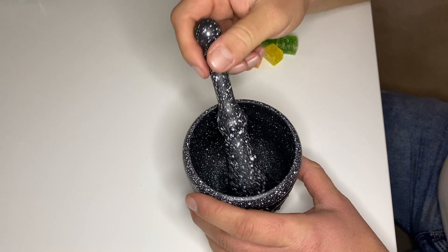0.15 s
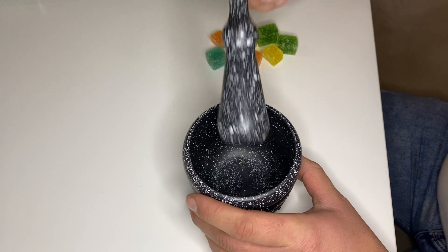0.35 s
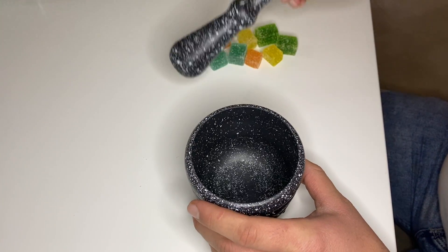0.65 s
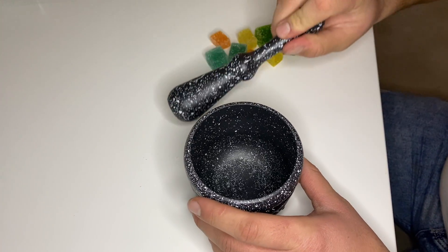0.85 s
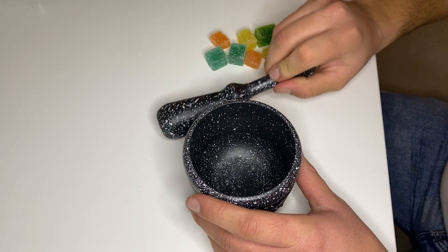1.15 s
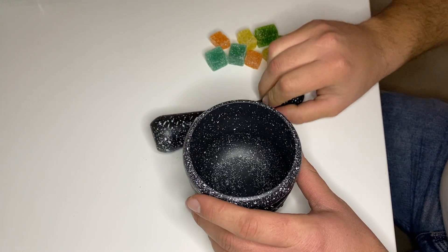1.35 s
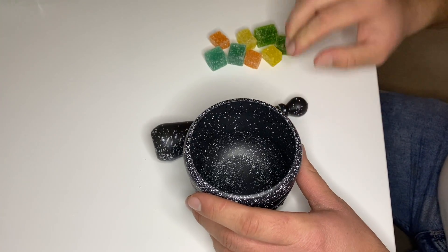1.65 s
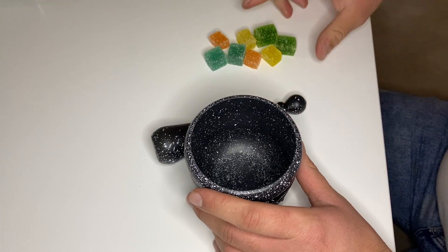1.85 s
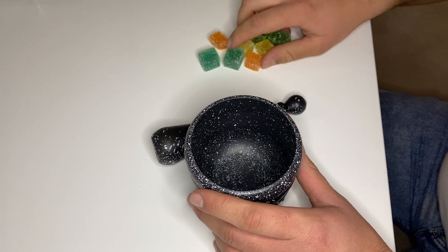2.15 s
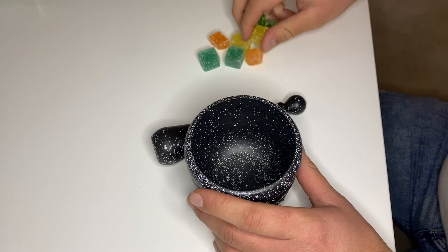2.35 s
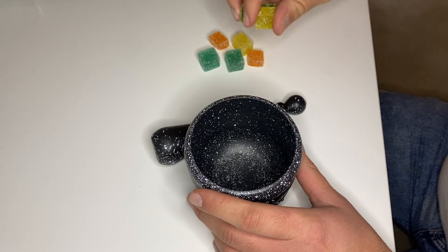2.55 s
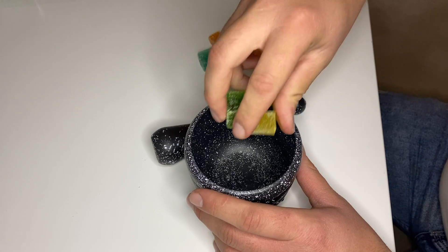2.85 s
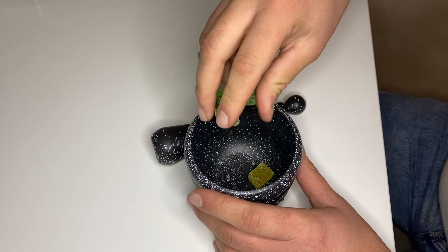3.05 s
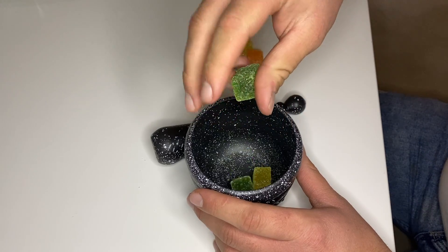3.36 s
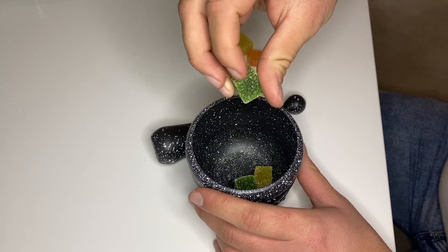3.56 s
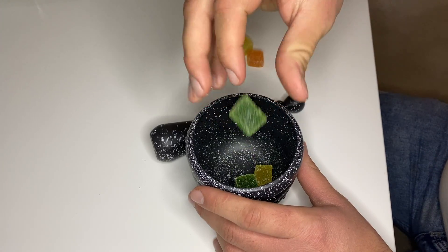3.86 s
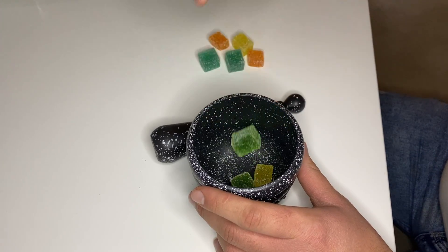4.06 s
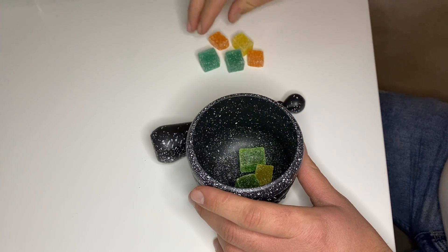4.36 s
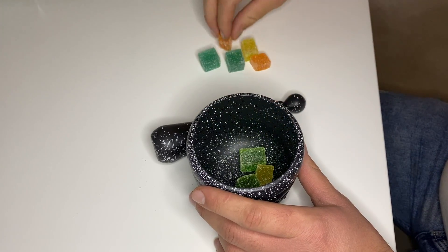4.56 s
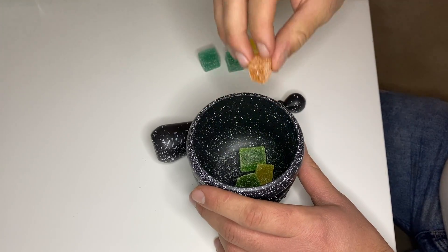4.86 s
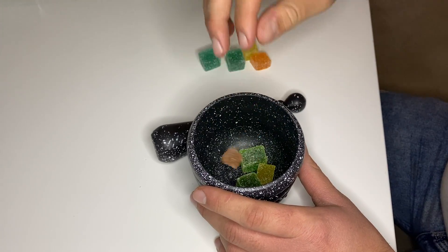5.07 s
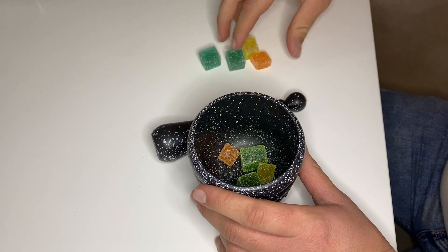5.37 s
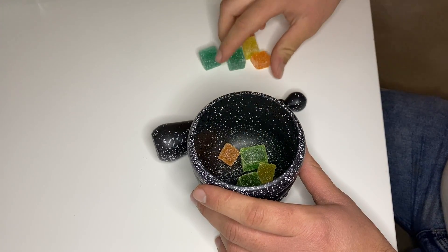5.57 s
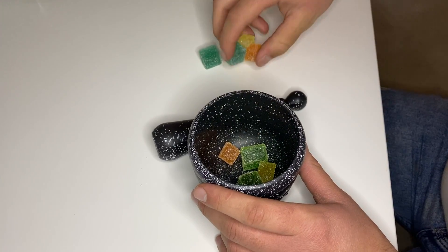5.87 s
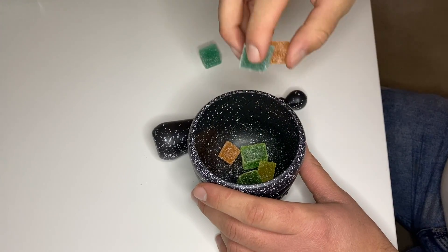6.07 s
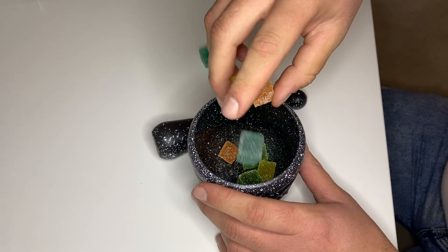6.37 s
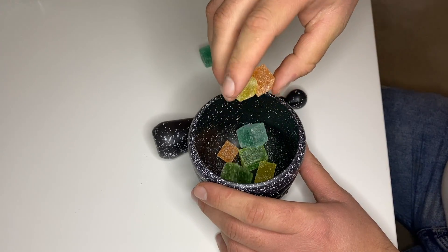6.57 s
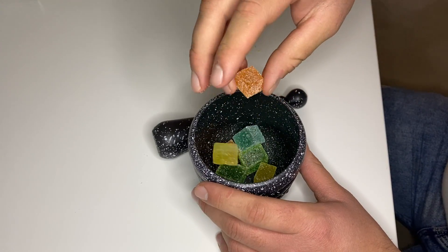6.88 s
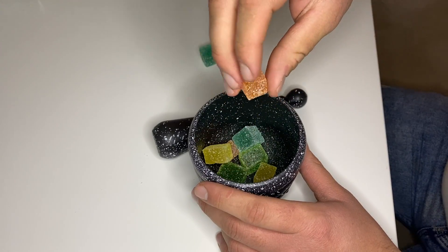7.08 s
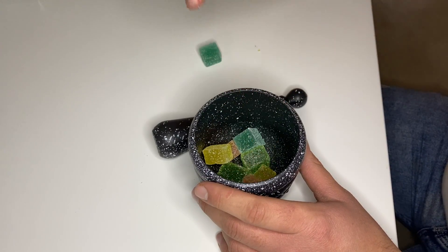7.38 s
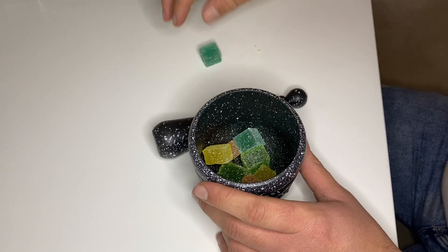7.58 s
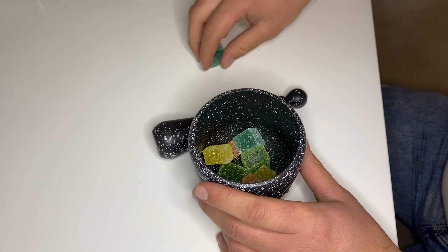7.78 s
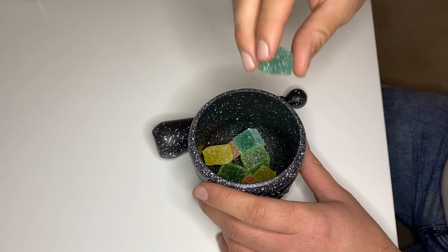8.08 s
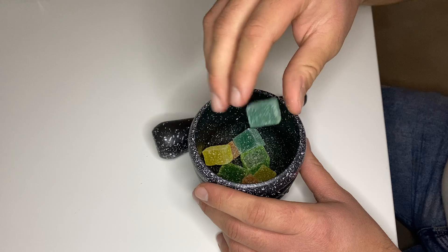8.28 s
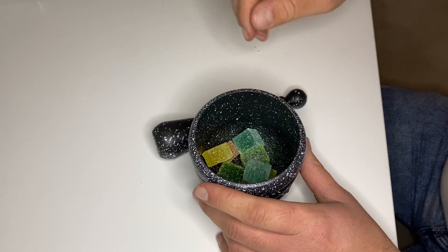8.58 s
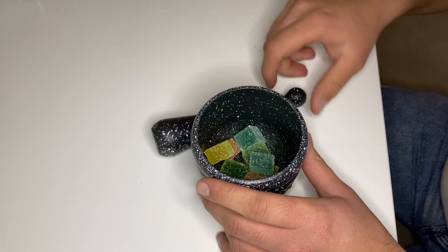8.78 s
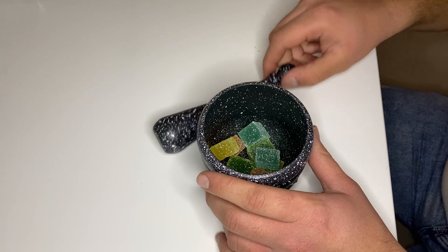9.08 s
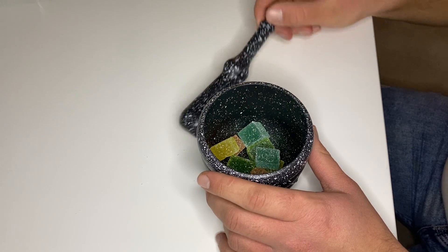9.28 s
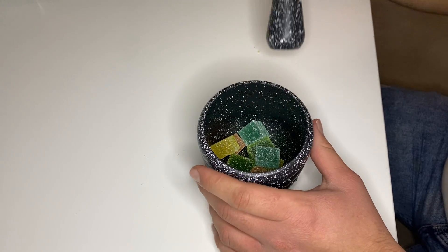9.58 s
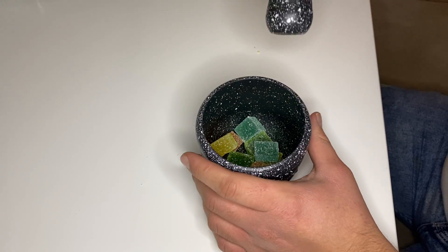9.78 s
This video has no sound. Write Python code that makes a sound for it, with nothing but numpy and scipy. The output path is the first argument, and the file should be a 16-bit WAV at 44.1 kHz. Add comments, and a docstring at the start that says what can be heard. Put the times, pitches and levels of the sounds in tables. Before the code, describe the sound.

Hard candy cubes land in a small stone bowl with crisp cracks and low table thuds, between a pestle's clunks and short dragging scrapes.

```python
"""Sugar-coated jelly cubes drop into a stone-like mortar: grain bursts crack and ring the bowl, thuds bend the table.
First the pestle is lifted out and laid on the table, chinking and clacking as damped modes; at the end it
is dragged off in coloured stick-slip clicks. Between drops, cubes scuff and slide on the table as
coloured grains. A small room adds a diffuse tail; hush and a low hand rumble are shaped noise."""
import sys
import numpy as np
from scipy import signal
from scipy.fft import rfft, irfft, next_fast_len
from scipy.io import wavfile
from scipy.ndimage import uniform_filter1d

SR = 44100
rng = np.random.default_rng(int(sys.argv[2]) if len(sys.argv) > 2 else 0)


def to_wav(s):
    """Save 16-bit WAV."""
    ch = np.atleast_2d(s).T  # columns
    pcm = np.round(np.clip(ch, -1, 1) * 32767)  # PCM
    wavfile.write(sys.argv[1], SR, pcm.astype(np.int16))


N = 437913
TIME = np.arange(N) / SR


def from_db(db):
    """Decibels to gain."""
    return 10 ** (np.asarray(db) / 20)


def rms_one(x):
    """Scale to rms 1."""
    return x / np.sqrt(np.mean(x ** 2) + 1e-20)


def unit_blow(x):
    """Scale a blow to rms 1 over its first 20 ms, at each microphone."""
    return x / np.sqrt(np.mean(x[..., :SR // 50] ** 2, axis=-1, keepdims=True) + 1e-20)


def at_hz(points, hz):
    """Interpolate a table on a log-frequency axis."""
    table_hz, values = np.array(points).T[:2]
    return np.interp(np.log(np.maximum(hz, 1)), np.log(table_hz), values)


def coloured(x, spectrum):
    """Filter a signal by a spectrum table in dB."""
    size = next_fast_len(x.shape[-1])
    gain = from_db(at_hz(spectrum, np.fft.rfftfreq(size, 1 / SR)))
    return irfft(rfft(x, size) * gain, size)[..., :x.shape[-1]]


# Left-right likeness of diffuse sound. Each row: frequency in Hz, correlation from 0 to 1.
LIKENESS = [(50, 0.84), (250, 0.97), (500, 0.19), (1000, 0.42), (2000, 0.062), (8000, 0.009)]


def diffuse(size):
    """Stereo noise from mid and side parts, weighted for the likeness at each frequency."""
    padded = next_fast_len(size)
    mid, side = rfft(rng.standard_normal((2, padded)))
    alike = at_hz(LIKENESS, np.fft.rfftfreq(padded, 1 / SR))
    spectrum = np.sqrt(1 + alike) * mid + np.sqrt(1 - alike) * side * [[1], [-1]]
    return irfft(spectrum, padded)[:, :size]


def add(out, s, sound):
    """Mix a sound in at a time in seconds."""
    start = round(s * SR)
    out[:, start:start + sound.shape[-1]] += sound[..., :N - start]


def opposite(pan_db):
    """Gain pair for a left-right level difference in dB."""
    return from_db(np.array([[pan_db], [-pan_db]]) / 2)


def soft_start(t, rise_s):
    """Gain of a yielding contact: it rises without a click."""
    return 1 - np.exp(-(t / rise_s) ** 2)


def decay(t, t60):
    """Exponential decay by 60 dB in t60 seconds."""
    return np.exp(-np.log(1000) * t / t60)


def mode(hz, t60, size):
    """A dying sine."""
    t = TIME[:size]
    return decay(t, t60) * np.sin(2 * np.pi * hz * t)


def slow_chance(rate_hz):
    """Random wander with rms 1: noise through two one-pole low-passes."""
    r = np.exp(-2 * np.pi * rate_hz / SR)
    return rms_one(signal.lfilter([1], [1, -2 * r, r * r], rng.standard_normal(N)))


def strokes(rows):
    """Gain over time of hand strokes (start s, length s, dB): each swells smoothly and fades."""
    rise_share = 0.32
    gain = np.zeros(N)
    for start, length, db in rows:
        first, last = np.searchsorted(TIME, [start, start + length])
        progress = np.interp((TIME[first:last] - start) / length, [0, rise_share, 1], [0, 1, 0])
        gain[first:last] += from_db(db) * np.sin(np.pi / 2 * progress) ** 2
    return gain


def grains(size, per_s, spread_db):
    """Random clicks of uneven size, partly alike at the two microphones."""
    born = rng.random(size) < per_s / SR
    heard = rng.standard_normal(size) + rng.standard_normal((2, size))
    return born * from_db(spread_db * np.minimum(rng.exponential(1, size), 4)) * heard


def crush(decay_s, per_s=14000, crumb_db=-17, crumb_s=0.0034):
    """A burst of breaking grains swells and dies away while a few more crumble."""
    t = TIME[:SR // 16]
    burst = grains(len(t), per_s, spread_db=6.5) * t / decay_s * np.exp(-t / decay_s)
    crumbs = grains(len(t), per_s=6000, spread_db=5.5) * np.exp(-t / crumb_s)
    return burst + from_db(crumb_db) * crumbs


def struck(force, modes, vary_db, detune=0.023):
    """A force rings a body; each mode gets a small random shift in pitch and strength, as contact points vary."""
    out = 0
    for k, (hz, db, t60, pan_db) in enumerate(modes):
        stronger, higher = rng.standard_normal(2)
        tone = mode(hz * (1 + detune * higher), t60, size=2500)
        ring = unit_blow(signal.fftconvolve(force, tone[None], axes=1)[:, :force.shape[1]])
        out = out + (-1) ** k * from_db(db + vary_db * stronger) * opposite(pan_db) * ring
    return out / np.sqrt(np.mean(out[:, :SR // 50] ** 2))


# Room air. Each row: frequency in Hz, relative density in dB per Hz.
HUSH = [(12, -36.5), (25, -15), (50, -1.5), (100, -20.5), (280, -30), (420, -24.5), (840, -33),
        (1300, -36.5), (2000, -39.5), (3200, -44), (3900, -44.5), (4600, -45), (6300, -47.5), (9000, -55),
        (16000, -73)]
# Hand rumble. Each row: frequency in Hz, relative density in dB per Hz.
RUMBLE_COLOUR = [(10, -57.5), (24, -24), (45, -6), (75, 4), (140, -4), (250, -5.5), (500, -27.5),
                 (1000, -54)]
# Hands moving about. Each row: start in seconds, length in seconds, gain added to the resting rumble in dB.
HAND_MOVES = [(1.2, 0.56, -61), (2.0, 0.33, -54), (3.1, 0.55, -66.5), (4.25, 0.88, -69),
              (4.65, 0.61, -58.5), (5.4, 0.54, -68), (6.55, 0.7, -52.5), (7.65, 0.64, -62),
              (9.05, 0.99, -58), (9.6, 0.54, -57.5)]


def background(hush_db=-65, resting_db=-67.5, lumpy_db=3.0):
    """Quiet room air, and a low lumpy rumble that swells while the hands move."""
    lumps_db = lumpy_db * rms_one(uniform_filter1d(rng.standard_normal(N), size=4000))
    rumble_gain = (from_db(resting_db) + strokes(HAND_MOVES)) * from_db(lumps_db)
    rumble = rumble_gain * rms_one(coloured(diffuse(N), RUMBLE_COLOUR))
    return from_db(hush_db) * rms_one(coloured(diffuse(N), HUSH)) + rumble


# Diffuse tail's colour. Each row: frequency in Hz, level in dB.
TAIL = [(100, -13.5), (260, 2), (420, -10), (700, 2.5), (1500, 0.5), (4000, -1), (8000, -3), (15000, -13.5)]
# Diffuse tail's decay. Each row: frequency in Hz, t60 in seconds.
TAIL_T60 = [(100, 0.63), (700, 0.47), (1800, 0.39), (4000, 0.33), (7000, 0.23), (14000, 0.3)]


def room(x, build_s=0.0027):
    """A diffuse tail builds up quickly; each band of noise decays at its own rate."""
    t = TIME[:SR * 2 // 3]
    hz = np.fft.rfftfreq(len(t), 1 / SR)
    noise = rfft(diffuse(len(t))) * from_db(at_hz(TAIL, hz))
    edges_hz, tail = np.geomspace(60, 18000, 17), 0
    for low, high in zip(edges_hz, edges_hz[1:]):
        band = irfft(noise * (hz >= low) * (hz < high), len(t))
        t60 = at_hz(TAIL_T60, np.sqrt(low * high))
        tail = tail + band * decay(t, t60) * np.sqrt(np.log(1000) / (t60 * SR))
    return signal.fftconvolve(x, tail * soft_start(t, build_s), axes=1)[:, :N]


# Short dry ticks and cracks. Each row: time in seconds, level in dB, pitch in Hz, t60 in seconds.
TICKS = [(.197, -47.5, 1960, 0.011), (1.857, -67, 5200, 0.0023), (6.0149, -52, 854, 0.0047),
         (9.459, -63, 2340, 0.0022)]


def dry_ticks():
    """Tiny close ticks: softly started sines with almost no ring."""
    out = np.zeros((2, N))
    for s, level_db, hz, t60 in TICKS:
        tick = mode(hz, t60, size=1000) * soft_start(TIME[:1000], rise_s=0.00052)
        add(out, s, from_db(level_db) * unit_blow(tick))
    return out


# Thin squeak while the fingers gather candies. Each row: time in seconds, pitch in Hz, level in dB.
SQUEAK = [(5.864, 1084, -89), (5.885, 1097, -60.5), (5.915, 1155, -75.5), (5.943, 1180, -68),
          (5.975, 1198, -68), (6.005, 1167, -89)]


def squeak(waver=.008, octave_db=-26):
    """A nearly pure, unsteady tone with a weak octave; it rises, then eases down at its end."""
    s, hz, db = np.transpose(SQUEAK)
    wavering_hz = np.interp(TIME, s, hz) * (1 + waver * slow_chance(rate_hz=34))
    phase = 2 * np.pi * np.cumsum(wavering_hz) / SR
    gain = from_db(np.interp(TIME, s, db, left=-np.inf, right=-np.inf))
    tone = np.sin(phase) + from_db(octave_db) * np.sin(2 * phase)
    return gain * np.sqrt(2) * tone * np.ones((2, 1))


# Rolling or dragged pestle. Each row: start in seconds, length in seconds, level in dB.
RATTLES = [(1.003, 0.064, -60), (1.735, 0.13, -48.5), (9.08, .15, -57), (9.2, 0.21, -58)]
# Rattle. Each row: frequency in Hz, relative density in dB per Hz.
RATTLE_COLOUR = [(600, -16), (1150, 16), (1700, 0), (2300, -6.5), (2650, -3), (3100, -16), (3600, -23),
                 (8000, -42.5)]


def pestle_rattle(per_s=1200):
    """The stone chatters on the table top in quick, uneven touches."""
    return strokes(RATTLES) * rms_one(coloured(grains(N, per_s, spread_db=3.0), RATTLE_COLOUR))


# Pulls on the pestle's heavy end. Each row: start in seconds, length in seconds, level in dB.
PULLS = [(8.94, 0.056, -49), (9.04, 0.082, -47), (9.11, 0.24, -47.5), (9.25, 0.15, -46.5)]
# Dull rubbing. Each row: frequency in Hz, relative density in dB per Hz.
DRAG_COLOUR = [(120, -31), (250, 0), (380, 17), (500, 7), (650, -4), (1150, -1.5), (1500, -12.5),
               (2500, -25), (2850, -23), (3060, -16.5), (3300, -23), (4000, -23), (9000, -55)]


def pestle_drag(per_s=3000, judder_db=4, judder_hz=45):
    """The heavy end sticks and slips over the table in uneven clumps."""
    judder = from_db(judder_db * np.clip(slow_chance(judder_hz), -2, 2))
    slips = grains(N, per_s, spread_db=0.5) * judder
    return strokes(PULLS) * rms_one(coloured(slips, DRAG_COLOUR))


# Pestle bumps on mortar and table. Each row: time in seconds, thud in dB, knock in dB, clack in dB,
# bowl chink in dB, shaft ring in dB, thud pitch in Hz.
PESTLE = [(0.089, -44.5, -52, -89, -74.5, -89, 398), (0.101, -35, -66, -90, -77, -86, 270),
          (0.163, -37, -56.5, -81, -71, -93, 415), (.197, -25, -36.5, -52.5, -46.5, -77, 382),
          (.239, -27.5, -39.5, -61, -57.5, -83, 383), (.261, -41, -62, -74, -76, -84, 343),
          (1.006, -28, -43, -71, -83, -66, 342), (1.128, -48.5, -53, -65.5, -90, -84, 368),
          (1.238, -37, -51.5, -87, -93, -94, 384), (1.383, -48, -66, -77, -70, -65.5, 298),
          (1.418, -43.5, -48, -82, -95, -82, 296), (1.733, -34, -38, -58, -59.5, -75, 440),
          (1.742, -38, -34.5, -41, -64, -61, 397), (1.785, -41, -52.5, -56, -85, -60, 317),
          (8.692, -47, -57.5, -103, -81, -103, 357), (8.869, -41.5, -54.5, -83, -73, -90, 375),
          (9.104, -35, -35.5, -72, -86, -66, 421), (9.219, -40.5, -65, -83, -81, -69, 370),
          (9.287, -38, -58, -77, -77, -70, 333)]
# Pestle's clack modes. Each row: frequency in Hz, relative level in dB, t60 in seconds, left-right in dB.
CLACK = [(1550, 12, 0.021, -1), (1720, 15.5, 0.12, -10), (2100, 9, 0.003, 3), (2390, -7, 0.024, 22.5),
         (2630, -2, 0.24, -18.5), (3350, -19.5, .015, -41.5)]
# Shaft's longer modes. Each row: frequency in Hz, relative level in dB, t60 in seconds, left-right in dB.
SHAFT = [(1600, -1, 0.068, 3.5), (1850, -5, .05, 2), (2150, -6, .04, -1), (2600, 0.5, 0.089, -3.5),
         (3060, 2, .05, -2.5)]


def pestle_clacks():
    """The hard pestle chatters for a moment on whatever it meets, and its shaft rings on."""
    out = np.zeros((2, N))
    for s, thud_db, knock_db, clack_db, chink_db, shaft_db, thud_hz in PESTLE:
        force = crush(decay_s=0.00007, crumb_db=-14.5)
        clack = from_db(clack_db) * struck(force, CLACK, vary_db=2.0)
        shaft = from_db(shaft_db) * struck(force, SHAFT, vary_db=0.5, detune=.004)
        add(out, s - .0005, clack + shaft)
    return out


# Bowl's short ring. Each row: frequency in Hz, relative level in dB, t60 in seconds, left-right in dB.
BOWL = [(1944, -10, 0.0098, -4.5), (3300, 0.5, 0.0035, 2), (3287, -7, 0.015, -1), (3815, 6, 0.033, -1),
        (5010, -1.5, .006, -0.5), (6350, -8.5, 0.0048, 2)]
# Pestle rubbing the bowl's inside as it is lifted: start in seconds, length in seconds, level in dB.
GRAZE = (0.16, 0.054, -53)
# Rubbing on the bowl wall. Each row: frequency in Hz, relative density in dB per Hz.
GRAZE_COLOUR = [(1300, -22.5), (2400, -15), (2900, -7), (3300, 6), (3800, -7.5), (4500, -17), (7000, -16),
                (12000, -44.5)]


def pestle_chinks():
    """The pestle's touches ring the bowl's modes; grains make its scrape along the wall on the way out."""
    out = strokes([GRAZE]) * rms_one(coloured(grains(N, per_s=1900, spread_db=3.5), GRAZE_COLOUR))
    for s, thud_db, knock_db, clack_db, chink_db, *rest in PESTLE:
        add(out, s, from_db(chink_db) * struck(crush(decay_s=0.00035), BOWL, vary_db=2))
    return out


# Fingers slide candies or pestle. Each row: start in seconds, length in seconds, friction in dB, rustle in dB.
SLIDES = [(0.075, 0.27, -62, -68), (1.157, 0.081, -64, -80.5), (1.362, 0.051, -57, -79),
          (2.059, 0.25, -46, -73), (2.341, 0.085, -38, -66), (4.275, 0.26, -97, -72.5),
          (4.448, 0.12, -52, -72.5), (4.537, 0.048, -74, -66), (4.944, 0.16, -81.5, -73),
          (5.579, 0.14, -48.5, -71.5), (5.726, 0.14, -83, -72), (5.983, 0.04, -66, -63.5),
          (8.236, 0.074, -66.5, -72), (9.094, 0.074, -66, -84), (9.242, 0.27, -58.5, -74.5),
          (9.617, 0.18, -65.5, -70.5)]
# Sliding friction. Each row: frequency in Hz, relative density in dB per Hz.
FRICTION = [(100, -2), (250, -5.5), (420, 8), (700, -1.5), (1200, -3), (2000, -13), (3000, -16.5),
            (6000, -48.5)]
# Rustling sugar. Each row: frequency in Hz, relative density in dB per Hz.
RUSTLE = [(1200, -33), (3000, -3.5), (4000, 0), (6300, 3), (8500, -9.5), (10500, -6.5), (15000, -48.5)]


def sliding():
    """Dense small slips on the table top, and sugar crystals rubbing between the fingers."""
    start, length, friction_db, rustle_db = np.transpose(SLIDES)
    friction = rms_one(coloured(grains(N, per_s=1600, spread_db=1.5), FRICTION))
    rustle = rms_one(coloured(grains(N, per_s=2300, spread_db=2.0), RUSTLE))
    friction_gain = strokes(zip(start, length, friction_db))
    rustle_gain = strokes(zip(start, length, rustle_db))
    return friction_gain * friction + rustle_gain * rustle


# Candies tip and scuff under the fingers. Each row: time in seconds, thud in dB, rasp in dB, sugar crunch in dB.
SCUFFS = [(1.857, -66, -60, -75), (2.037, -47.5, -60.5, -75), (2.08, -51, -53, -78),
          (2.132, -52, -52.5, -54.5), (2.189, -48, -55, -79), (2.26, -45.5, -58, -77),
          (2.359, -42.5, -34, -70), (2.38, -39.5, -40, -57), (2.411, -43, -40.5, -45.5),
          (4.437, -53.5, -63, -86), (4.464, -47.5, -50, -88), (4.496, -47, -54.5, -76),
          (5.401, -56, -67, -95), (5.601, -53, -60.5, -92), (5.623, -43, -60, -77),
          (5.721, -51.5, -60, -65), (7.731, -41, -62, -79), (7.753, -52, -60, -76),
          (8.831, -52.5, -62.5, -67.5)]
# Grit on the table. Each row: frequency in Hz, relative density in dB per Hz.
RASP = [(600, -16.5), (1300, 9.5), (2400, 3.5), (3300, -4.5), (5000, -8.5), (7000, -22.5), (14000, -57)]
# Crack of the sugar crust. Each row: frequency in Hz, relative density in dB per Hz.
SUGAR = [(500, -18), (1500, -22.5), (3000, 4), (5000, -2.5), (6800, 6.5), (8400, -11), (9400, 0),
         (10800, -4), (12000, -23), (13500, -13.5), (16000, -32)]


def candies_on_table():
    """A cube tips over and its crust grinds briefly on the table top."""
    out = np.zeros((2, N))
    for s, thud_db, rasp_db, crunch_db in SCUFFS:
        add(out, s - .001, from_db(rasp_db) * unit_blow(coloured(crush(decay_s=0.00412), RASP)))
        add(out, s - .001, from_db(crunch_db) * unit_blow(coloured(crush(decay_s=0.00051), SUGAR)))
    return out


# Table top's crowded, well damped higher modes. Each row: frequency in Hz, relative level in dB.
BOARD = [(250, -27.5), (480, -7), (630, -5), (740, 8), (950, -1), (1170, 4), (1400, -8), (1700, -20),
         (2400, -24.5), (3500, -37.5), (8000, -63)]


def knocks(rows, t60):
    """The harder part of a contact sets the table's crowded higher modes ringing briefly."""
    out, t = np.zeros((2, N)), TIME[:SR // 12]
    shape = soft_start(t, rise_s=0.00039) * decay(t, t60)
    for s, thud_db, knock_db, *rest in rows:
        add(out, s, from_db(knock_db) * unit_blow(coloured(diffuse(len(t)), BOARD) * shape))
    return out


def right_later(x, lag_s):
    """The sound reaches the right microphone a little after the left."""
    return np.array([x[0], np.interp(TIME - lag_s, TIME, x[1])])


def scattered(blow, tail_db=-4, t60=0.43):
    """Each spot of the table radiates into the room differently, so every thud has a blurred tail of its own."""
    t = TIME[:blow.shape[1]]
    paths = diffuse(len(t)) * soft_start(t, rise_s=0.0068) * decay(t, t60)
    tail = signal.fftconvolve(blow, paths, axes=1)[:, :len(t)]
    return blow + from_db(tail_db) * blow.std() * rms_one(tail)


# Low standing waves of table and room. Each row: frequency in Hz, relative level in dB, t60 in seconds.
BOOM = [(87.65, -18, 0.21), (135, -14, 0.4), (180, -18, 0.39), (246.5, -4.5, 0.2), (271.1, -3.5, 0.13),
        (309.5, -4.5, 0.083), (352.4, -12, 0.13), (372.1, -8, 0.16), (421, -21.5, 0.39),
        (469.8, -16.5, 0.25), (499.6, -13.5, 0.28), (539, -9, 0.17), (599, -21.5, 0.2), (678.7, -21, 0.17),
        (718.9, -11.5, 0.11), (805, -25.5, 0.049)]
# Bending waves travel faster when higher: a thud falls to its pitch, which differs from blow to blow.
THUD_FALL_OCTAVES, THUD_FALL_S, THUD_VARY_OCTAVES = 0.75, 0.0016, 0.04
BEND_DB = 4.5  # on the scale of the standing waves
WALL_ECHO_S, WALL_ECHO_DB = .0128, -3.5


def thuds(rows, bend_t60, vary_db=3, right_lag_s=.00005, detune=0.013, off_pitch_db=4):
    """Each blow (s, dB, Hz) bends the table top at its own pitch and stirs most the standing waves near it."""
    out, t = np.zeros((2, N)), TIME[:SR // 2]
    hz, level_db, t60 = np.transpose(BOOM)[..., None]
    wave_gain = from_db(level_db) * decay(t, t60) * soft_start(t, rise_s=0.0087)
    bend_gain = from_db(BEND_DB) * decay(t, bend_t60) * soft_start(t, rise_s=.0016)
    fall = np.cumsum(2 ** (THUD_FALL_OCTAVES * np.exp(-t / THUD_FALL_S))) / SR
    for s, thud_db, thud_hz in rows:
        bend_hz = thud_hz * 2 ** (THUD_VARY_OCTAVES * rng.uniform(-1, 1))
        bend = bend_gain * np.sin(2 * np.pi * bend_hz * fall)
        bend = bend + from_db(WALL_ECHO_DB) * np.interp(t - WALL_ECHO_S, t, bend)
        turns = hz * (1 + detune * rng.standard_normal(hz.shape)) * t + rng.random(hz.shape)
        waves = wave_gain * np.sin((2 * np.pi * turns).astype(np.float32))
        chance = rng.standard_normal(len(BOOM)) + .5 * rng.standard_normal((2, len(BOOM)))
        octaves_off = np.abs(np.log2(hz[:, 0] / thud_hz))
        strengths = from_db(vary_db * chance - off_pitch_db * octaves_off)
        add(out, s, scattered(from_db(thud_db) * unit_blow(bend + strengths @ waves)))
    return right_later(out, right_lag_s)


def near_echoes(x, first_db=-16, second_db=-17):
    """Sound leaving the bowl comes back from the hands and the table within a few milliseconds."""
    out = x.copy()
    add(out, .0024, from_db(first_db) * x[::-1])  # sides swapped
    add(out, .0075, from_db(second_db) * x)
    return out


# Candies land or bounce in the mortar. Each row: time in seconds, thud in dB, knock in dB, bowl chink in dB,
# sugar crunch in dB, chink pitch in Hz, left-right in dB, bowl ring against the chink in dB, thud pitch in Hz.
DROPS = [(2.884, -56.5, -65.5, -69, -76, 3562, 0.5, -8, 349),
         (2.974, -24, -28.5, -18.5, -29, 3210, 0, -12.5, 331),
         (3.213, -40, -51, -49, -43, 4020, 0, -5.5, 440),
         (3.23, -31.5, -47.5, -47.5, -41, 3700, -0.5, 1.5, 473),
         (3.238, -17.5, -23, -24.5, -27.5, 3550, 1.5, -1.5, 465),
         (3.265, -47.5, -49, -46.5, -50, 3550, 1.5, -4.5, 400),
         (3.322, -31, -45, -28.5, -30, 3440, 0.5, -3.5, 315),
         (3.346, -35.5, -60, -49, -57, 3550, 1.5, -5.5, 314),
         (3.397, -54.5, -61, -58, -62, 3600, 2, -3, 326), (3.411, -31.5, -47, -48, -76, 3230, -5, -10, 273),
         (3.946, -24.5, -35.5, -43, -45.5, 3000, 5, -10.5, 406),
         (3.981, -21, -26, -32.5, -32.5, 3580, 1, 1.5, 397),
         (4.032, -54, -40, -49.5, -50, 3820, -1.5, -16.5, 310),
         (4.099, -24.5, -37, -37.5, -44, 3630, 1, -31, 425),
         (4.143, -56, -60, -69, -67, 3680, -3, -17, 330),
         (4.158, -51, -41.5, -37, -80, 3050, -4, -9.5, 295),
         (4.177, -40.5, -69, -53, -54.5, 3150, 1, -11, 290),
         (5.018, -41.5, -59, -85, -91, 3840, 1, -6, 383), (5.052, -31.5, -45, -41, -51, 3720, -1, -8, 298),
         (5.145, -31.5, -34.5, -39, -44, 3820, -0.5, -0.5, 407),
         (5.172, -40, -60, -43, -45.5, 3670, 1, 3, 283), (5.196, -42, -43.5, -43, -56.5, 3780, -1, -8, 328),
         (5.215, -41, -49, -54, -63, 3670, 3, 1.5, 420), (6.423, -27.5, -48, -60, -53, 4100, 2, 13, 340),
         (6.443, -33, -54, -55, -58, 3400, 0, -7, 268), (6.484, -33, -49.5, -52, -61, 3200, -0.5, -9, 404),
         (6.529, -42, -57, -34.5, -37.5, 3230, -0.5, -12, 360),
         (6.537, -44.5, -50.5, -49, -49, 3740, 0.5, 13, 370),
         (6.547, -31.5, -36.5, -39.5, -49, 3460, 1, -33, 378),
         (6.626, -49, -80, -51, -51.5, 3320, -1, -27, 290), (6.662, -63, -71, -59, -59, 3700, 0, 1, 320),
         (6.682, -32.5, -41.5, -44, -58, 3660, 0, -7, 397), (6.694, -65, -67, -50, -60, 3720, 3, 2, 330),
         (6.838, -24, -39, -28, -42, 4480, 2, -13, 342),
         (6.948, -46.5, -47.5, -47, -58, 3910, 0, -2.5, 435),
         (7.045, -47.5, -55, -60.5, -89, 3860, -1, -1, 310),
         (7.268, -27, -35.5, -35, -42.5, 3350, 0, -7.5, 373),
         (7.367, -41, -43.5, -39.5, -74, 3660, -1, -7, 430),
         (7.39, -46.5, -45, -52, -64, 3480, -2, -7, 500),
         (8.387, -23.5, -38.5, -30, -40, 3590, 0, -11, 317),
         (8.451, -42.5, -42.5, -46, -43, 4160, -1.5, 0, 270),
         (8.576, -41, -63, -77.5, -91, 3630, -1, -6, 292), (8.64, -39.5, -57, -62, -63, 3420, 1, 0, 401)]


def loose_sugar(level_db=-36, decay_s=.06, per_s=170):
    """Each landing shakes off crystals that skitter about the bowl for a moment."""
    shaken = np.zeros(N)
    for s, thud_db, *rest in DROPS:
        shaken[round(s * SR)] = from_db(thud_db + level_db)
    unrest = signal.lfilter([1], [1, -np.exp(-1 / (decay_s * SR))], shaken)
    return unrest * rms_one(coloured(grains(N, per_s, spread_db=7.5), SUGAR))


CRACK_LEAD_S = .003  # the first grains give way this long before the main crack


def crack(decay_s, even=0.51, apart=0.83):
    """A close crush with a partly flattened spectrum, only partly alike at the two microphones."""
    common, own = np.roll(crush(decay_s), round(CRACK_LEAD_S * SR), axis=1)
    spectrum = rfft(common + apart * own * np.array([[1], [-1]]))
    return irfft(spectrum / (np.abs(spectrum) + 1e-9) ** even)


# Bowl's many weak, damped modes between the strong ones. Each row: frequency in Hz, relative density in dB per Hz.
CLATTER = [(600, -29.5), (1300, -17), (2300, -15.5), (3100, -0.5), (4700, -1.5), (5600, -17.5),
           (7500, -21.5), (14000, -35)]


def candies_in_bowl(clatter_db=-4, main_db=-5, main_t60=0.006):
    """The sugar crust cracks for a millisecond or two and rings the bowl; the spot it hits sets the main pitch."""
    out = np.zeros((2, N))
    for s, thud_db, knock_db, chink_db, crunch_db, main_hz, pan_db, ring_db, thud_hz in DROPS:
        force = crack(decay_s=0.00026)
        ring = from_db(ring_db) * struck(force, BOWL, vary_db=1.5, detune=0.018)
        main = signal.lfilter(mode(main_hz, main_t60, size=600), [1], force)
        clatter = coloured(crack(decay_s=0.00032), CLATTER)
        chink = ring + from_db(main_db) * unit_blow(main) + from_db(clatter_db) * unit_blow(clatter)
        crunch = unit_blow(coloured(crack(decay_s=0.00053), SUGAR))
        both = from_db(chink_db) * chink + from_db(crunch_db) * crunch
        add(out, s - CRACK_LEAD_S - .0008, opposite(pan_db) * both)
    return out


def scene(bowl_right_lag_s=.0005, scuff_thud_hz=388, scuff_knock_rise_db=-2):
    """The bowl points at the microphones, nearer the left, and sounds dry; the table radiates into the room."""
    # a scuff's knock lies midway between its thud and its rasp, shifted by scuff_knock_rise_db
    scuff_knocks = [(s, thud_db, (thud_db + rasp_db) / 2 + scuff_knock_rise_db)
                    for s, thud_db, rasp_db, crunch_db in SCUFFS]
    in_bowl = candies_in_bowl() + loose_sugar() + pestle_chinks()
    bowl = near_echoes(right_later(in_bowl, bowl_right_lag_s))
    low = (thuds([(s, db, hz) for s, db, *rest, hz in DROPS], bend_t60=0.03)
           + thuds([(s, db, hz) for s, db, *rest, hz in PESTLE], bend_t60=0.046)
           + thuds([(s, db, scuff_thud_hz) for s, db, *rest in SCUFFS], bend_t60=0.033))
    board = knocks([*DROPS, *PESTLE], t60=0.079) + pestle_clacks() + squeak()
    table = knocks(scuff_knocks, t60=0.01344) + candies_on_table() + sliding()
    table = table + pestle_drag() + pestle_rattle()
    room_send = from_db(-8.0) * bowl + from_db(-6.0) * board + table
    return bowl + low + board + table + dry_ticks() + room(room_send) + background()


def record(dry, bass_cut_hz=36, cutoff_hz=16300):
    """The microphones lose the deepest bass and the top is cut steeply; the loudest peaks are softly rounded so
    they never clip."""
    heard = signal.sosfilt(signal.butter(2, bass_cut_hz, "high", fs=SR, output="sos"), dry)
    rounded = .85 * np.tanh(heard / .85)
    return signal.sosfilt(signal.ellip(10, .1, 80, cutoff_hz, fs=SR, output="sos"), rounded)


dry = scene()
out = record(dry)
to_wav(out)
```